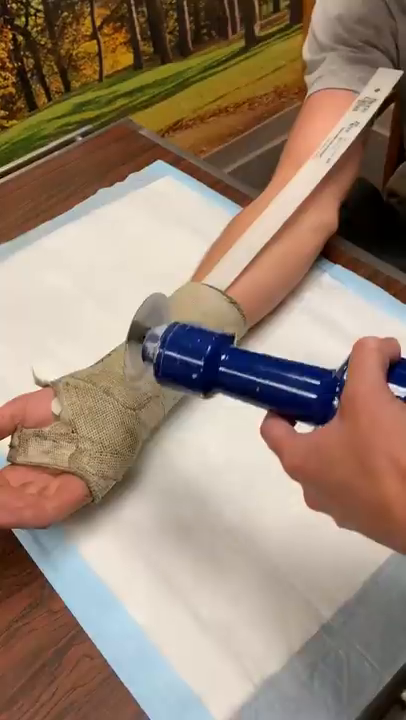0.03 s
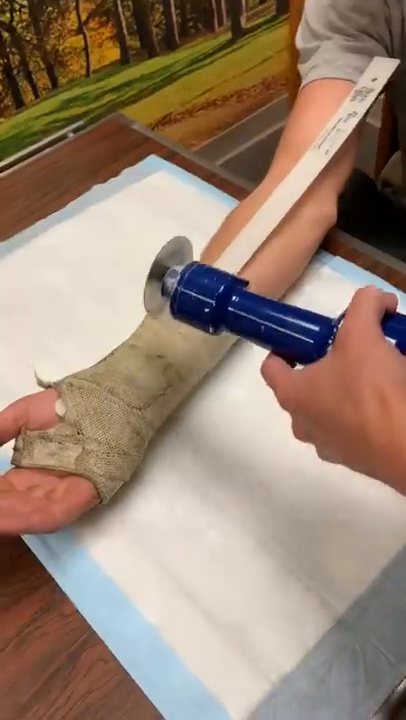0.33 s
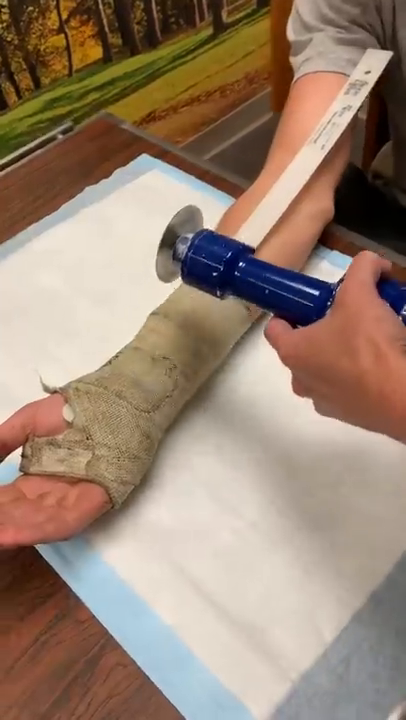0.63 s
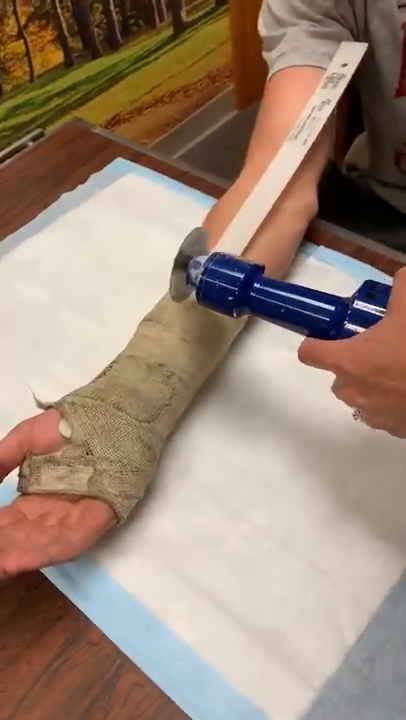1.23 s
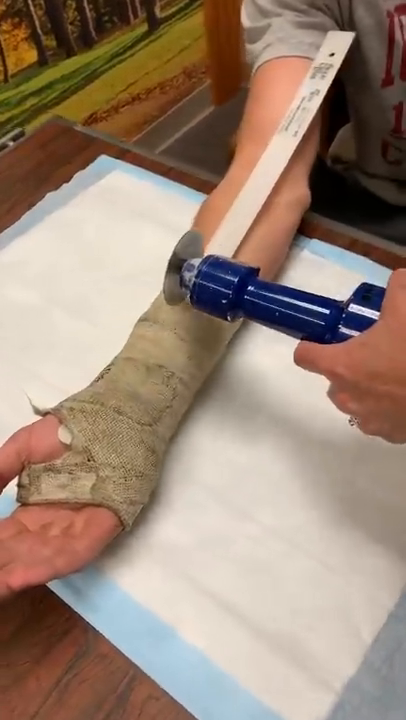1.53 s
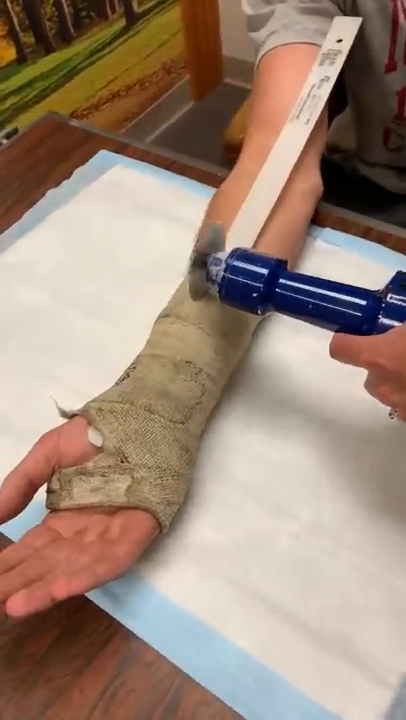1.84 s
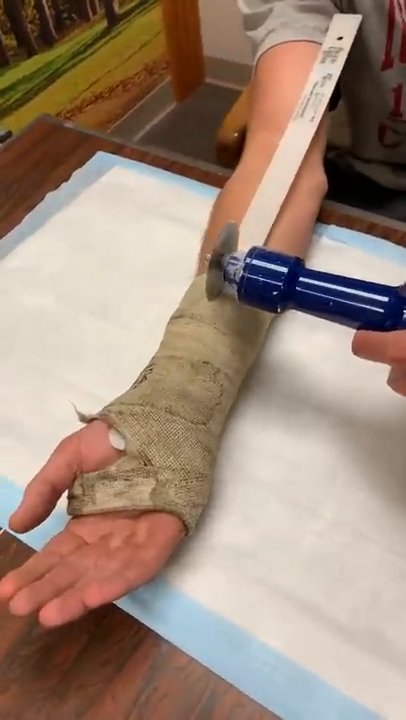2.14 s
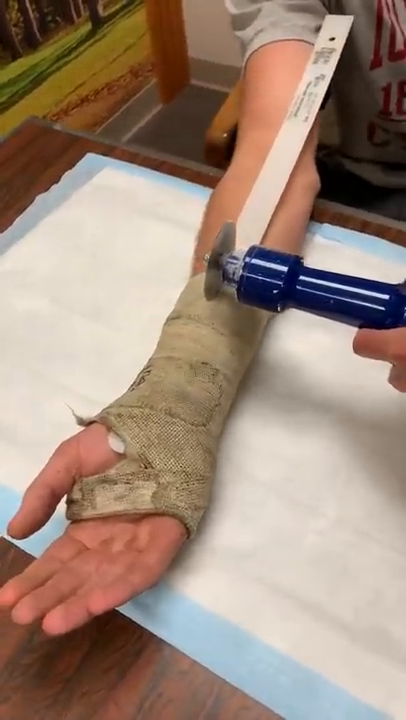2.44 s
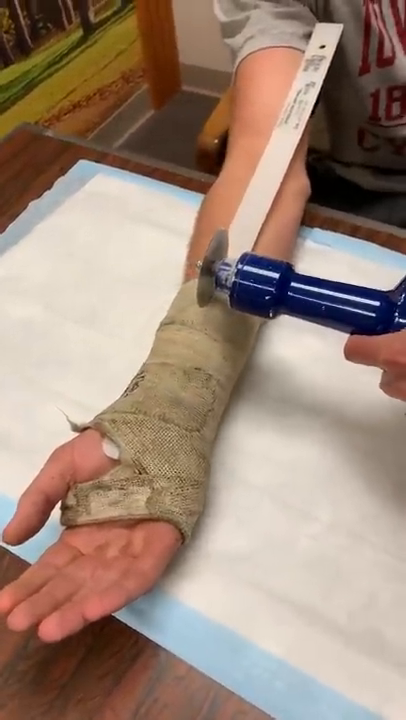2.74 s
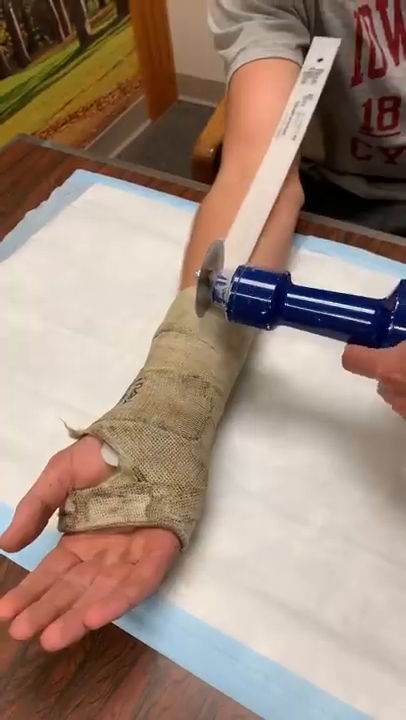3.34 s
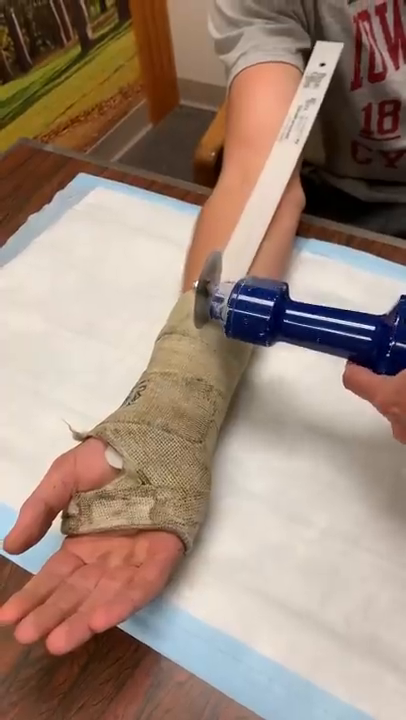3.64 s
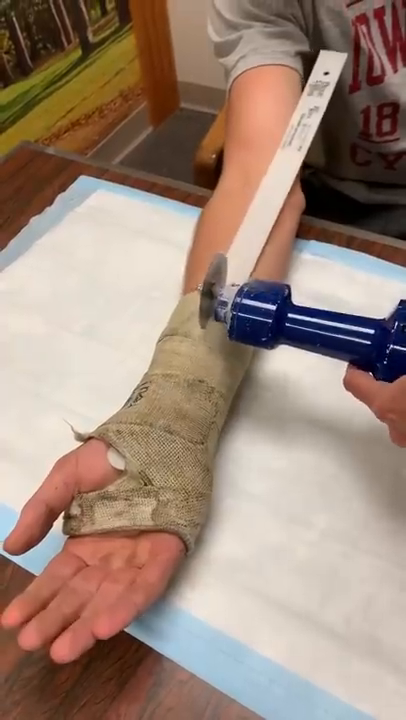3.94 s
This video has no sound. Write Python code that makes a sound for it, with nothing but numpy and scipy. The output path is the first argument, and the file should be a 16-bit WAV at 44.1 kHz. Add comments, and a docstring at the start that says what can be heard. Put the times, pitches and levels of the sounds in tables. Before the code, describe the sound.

Harsh, rasping whine of an electric saw cutting through a hard arm cast, close by.

```python
"""A harsh buzz cuts in abruptly and drops out for an instant: an oscillating cast saw, close by in a
small room, runs up to speed, bites into a hard cast and sags under load. Each stroke of the blade is a
knock and a burst of friction. The periodic knocks form a harmonic series; the friction makes a pulsing
rasp and excites the steel blade, which rings near 5.5 kHz. The gearbox growls at first, and faint mains
hum and room rumble lie underneath."""
import sys
import numpy as np
from scipy import signal
from scipy.fft import rfft, irfft, next_fast_len
from scipy.io import wavfile
from scipy.ndimage import map_coordinates

SR = 44100
rng = np.random.default_rng(int(sys.argv[2]) if len(sys.argv) > 2 else 0)


def dump(signal):
    """Clip the signal to [-1, 1] and save it as 16-bit WAV at the path in sys.argv[1]."""
    limited = np.clip(np.atleast_2d(signal).T, -1, 1)
    pcm = np.round(limited * 32767).astype(np.int16)
    wavfile.write(sys.argv[1], SR, pcm)


N = 176400

# Levels in the tables are relative; each source adds its own gain.
# motor running up, then sagging under load (time [s], stroke rate [Hz])
STROKE_RATE = [(0.08, 206), (0.15, 221), (0.25, 245), (0.35, 249), (0.45, 261), (0.55, 266.9),
               (0.75, 274.3), (0.95, 278.6), (1.2, 281.8), (1.7, 283), (1.97, 279), (2.25, 273.5),
               (2.35, 272), (2.45, 267.5), (2.92, 262), (3.13, 251), (3.25, 254), (3.5, 258), (3.68, 254),
               (4.0, 249)]
# drone at the stroke rate (time [s], level [dB])
FUNDAMENTAL = [(0.08, -61), (0.38, -47.5), (0.69, -58.5), (0.84, -51), (1.89, -52.5), (1.96, -66),
               (2.08, -49), (2.27, -41), (3.01, -51), (3.11, -42.5), (3.58, -48.5), (4.0, -39)]
# two whining harmonics (time [s], 6th harmonic [dB], 7th harmonic [dB])
WHINE_LEVELS = [(0.11, -55, -42), (0.25, -45, -37), (0.35, -54, -52), (0.44, -33.5, -63),
                (0.801, -42.5, -71), (0.95, -36, -42), (1.25, -39, -49), (1.6, -36.5, -51),
                (1.95, -39, -43), (2.06, -47, -33), (2.17, -37, -33), (2.25, -42, -37.5), (2.34, -42, -29),
                (2.45, -53, -43), (2.55, -42, -34.5), (2.65, -57, -38), (2.75, -40.5, -36.5),
                (2.95, -42.5, -37), (3.05, -53, -38), (3.25, -50, -40.5), (3.35, -48, -36),
                (3.47, -36.5, -46.5), (3.75, -43.5, -39.5), (3.97, -50, -43.5)]
# body of the buzz (harmonic number, level in a light cut [dB], level in a deep cut [dB])
LOW_HARMONICS = [(2, -51.5, -52), (3, -48.5, -52), (4, -50, -57.5), (5, -45, -47), (8, -44.5, -50.5),
                 (9, -49.5, -56), (10, -52, -47), (11, -50.5, -47), (12, -45.5, -46), (13, -56.5, -44),
                 (14, -46, -43), (15, -37, -46), (16, -38, -55), (17, -43, -64), (18, -49, -64)]
# spectral envelope of the buzz's treble harmonics (frequency [Hz], level [dB])
TREBLE_SPECTRUM = [(4700, -44), (5600, -44), (6200, -52), (6900, -55.5), (7700, -44.5), (8400, -54.5),
                   (9500, -58), (11000, -57), (12300, -52), (14000, -51), (16000, -48)]
# treble edge, strongest with the blade pressed in (time [s], gain [dB])
TREBLE_EDGE = [(0.1, 1), (1.0, -0.5), (1.95, 0), (2.05, -3.5), (2.55, 3), (3.0, -2), (4.0, -2)]
# brief swells of single harmonics (time [s], width [s], level [dB], harmonic number)
SQUEALS = [(0.22, 0.067, -39.5, 3), (0.66, 0.14, -40, 3), (0.6, 0.2, -49, 17), (0.6, 0.33, -40, 12),
           (1.07, 0.36, -43.5, 10), (1.65, 0.33, -38, 29), (1.8, 0.1, -42, 43), (2.03, 0.087, -34, 44),
           (2.09, 0.06, -37, 24), (2.22, 0.13, -31.5, 18), (2.26, 0.086, -38, 45), (2.3, 0.21, -43, 17),
           (2.329, 0.017, -28, 25), (2.46, 0.045, -35, 25), (2.48, 0.13, -36, 12), (2.49, 0.06, -40, 46),
           (2.5, 0.07, -35, 34), (2.53, 0.1, -32, 10), (2.96, 0.03, -35, 13), (2.98, 0.14, -42.5, 8),
           (3.6, 0.09, -39, 13)]
# the steel blade's two main modes (frequency [Hz], bandwidth [Hz], gain [dB])
BLADE_MODES = [(5341, 65, 6), (5736, 310, 0)]
# the blade's upper modes (frequency [Hz], bandwidth [Hz], gain [dB])
UPPER_MODES = [(8300, 240, -2), (14300, 60, -5.5)]
# the shaft's mode (frequency [Hz], bandwidth [Hz], gain [dB])
SHAFT_MODE = [(4106, 250, 0)]
# clean singing of the main blade modes (time [s], first mode [dB], second mode [dB])
BLADE_SINGING = [(0.11, -27, -41), (0.26, -20.5, -36), (0.36, -27.5, -32), (0.43, -17, -39),
                 (0.53, -37, -28), (0.731, -24, -26), (0.84, -28, -40), (0.95, -17.5, -43),
                 (1.07, -19.5, -26), (1.17, -25, -36), (1.4, -35, -31), (1.61, -26.5, -41.5),
                 (1.83, -29, -28), (1.96, -21.5, -25), (2.1, -40, -26), (2.27, -28, -27.5),
                 (2.4, -48, -30.5), (2.66, -28, -35), (2.84, -39, -26.5), (3.1, -33, -38),
                 (3.33, -31.5, -27), (3.97, -35, -32)]
# clean singing of the shaft (time [s], level [dB])
SHAFT_SINGING = [(0.11, -29), (0.6, -27.5), (0.9, -35), (1.25, -30.5), (1.7, -40.5), (2.1, -54)]
# rough ring of the main blade modes (time [s], first mode [dB], second mode [dB])
BLADE_RING = [(0.11, -21.5, -39), (0.37, -23, -35), (0.41, -28, -39), (0.56, -18, -32), (0.751, -29, -42),
              (0.86, -25.5, -29.5), (1.1, -36, -28.5), (1.18, -30.5, -31.5), (1.8, -28, -45),
              (1.84, -35, -27.5), (1.93, -25, -37), (2.07, -26.5, -30.5), (2.72, -44, -29.5),
              (3.18, -47, -27.5), (3.83, -26, -26.5), (3.97, -29, -30)]
# rough ring of the upper blade modes (time [s], level [dB])
UPPER_RING = [(0.11, -19.5), (0.31, -31), (0.5, -23), (0.83, -27.5), (1.01, -24), (1.1, -34), (1.39, -28.5),
              (2.15, -29.5), (2.6, -36), (2.98, -30), (3.29, -48), (3.97, -27)]
# friction of the teeth in the cast (time [s], scrape level [dB], hiss level [dB])
RASP_LEVELS = [(0.11, -28, -21), (0.28, -30, -24.5), (0.69, -30.5, -26), (0.82, -33, -27.5),
               (0.87, -30.5, -28.5), (1.04, -35, -34.5), (1.25, -33, -33.5), (1.39, -33.5, -33),
               (1.95, -33.5, -32), (2.08, -33.5, -30.5), (2.32, -34.5, -31), (2.62, -34, -34.5),
               (2.87, -34.5, -32), (3.07, -33.5, -32), (3.11, -31, -32.5), (3.43, -36.5, -33),
               (3.92, -31, -30), (3.97, -33.5, -34.5)]
# the lower scrape of the teeth (frequency [Hz], level [dB])
SCRAPE_SPECTRUM = [(30, -58), (170, -21), (250, -23), (400, -5.5), (550, -8), (750, -9.5), (1000, -6),
                   (1300, -6), (1700, -3.5), (2000, -1), (2400, -11.5), (3000, -1), (3500, 1), (4100, 12),
                   (4700, -29), (5500, 6), (6500, 3), (9000, -35)]
# the higher hiss of the teeth (frequency [Hz], level [dB])
HISS_SPECTRUM = [(1000, -28.5), (4000, -8), (5500, -24), (6400, -14), (6800, 6.5), (7700, 1), (8400, -20),
                 (9100, -5), (9600, 2), (10500, -2), (12000, -6.5), (13300, -7), (14700, -2.5),
                 (15100, 0.5), (16000, -9.5)]
# teeth catching in the cast (release time [s], build-up [s], level [dB])
CATCHES = [(0.98, 0.11, -41.5), (2.34, 0.038, -34), (3.077, 0.056, -34.5)]
# crunch of a catch (frequency [Hz], level [dB])
CRUNCH_SPECTRUM = [(100, -21), (600, -20), (1400, 0), (2000, 2.5), (3200, 1.5), (4500, -28), (8000, -30)]
# the gearbox housing's mode (frequency [Hz], bandwidth [Hz], gain [dB])
HOUSING_MODE = [(816, 620, 0)]
# dull bump as the blade catches (time [s], frequency [Hz], level [dB], width [s])
BUMP = [(3.12, 87, -51, 0.036)]
# mains harmonics (frequency [Hz], level [dB])
MAINS_HUM = [(120, -70.5), (180, -84.5)]
# course of the room rumble (time [s], level [dB])
RUMBLE_LEVEL = [(.1, -57), (.5, -78), (1, -78), (3.5, -80), (4, -64)]
# colour of the room rumble (frequency [Hz], level [dB])
RUMBLE_SPECTRUM = [(20, -32), (45, -22), (80, 12), (150, -5), (400, -22), (4000, -50)]
# colour of the wall reflections (frequency [Hz], gain [dB])
ROOM_COLOUR = [(250, 2.5), (500, 7), (2200, 5.5), (4500, -6.5), (9000, -19), (16000, -5)]
# phase between the two microphone ports (frequency [Hz], lead of the left [rad])
PORT_PHASE = [(0, 0), (1400, -.2), (2200, 1.9), (3200, 1.4), (4570, 3.14), (6700, 6.28), (9050, 9.42),
              (11200, 12.57), (13100, 15.7), (16000, 19.6)]
# balance of the two ports (frequency [Hz], left minus right [dB])
PORT_BALANCE = [(60, -1), (150, -0.5), (700, -5), (1600, -2), (3000, 0), (16000, 0)]
# abrupt onset and one dropout (time [s], gain [0-1])
GATE = [(.0595, 0), (.0615, 1), (.069, 1), (.074, 0), (.083, 0), (.0855, 1)]

TIME = np.arange(N) / SR
BITE_SHARPNESS = 0.79  # how closely the friction clings to one moment of the stroke


def drive_buzz(stroke_hz, strokes, pressed_in_s=1.874):
    """Periodic excitation: a knock at every stroke gives harmonics of the stroke rate."""
    drone = amp(curves(FUNDAMENTAL)[0] - 1) * harmonic(strokes, 1, waver_db=1)
    whine = sum(amp(db - 0.93) * harmonic(strokes, order, waver_db=0.5)
                for order, db in zip((6, 7), curves(WHINE_LEVELS)))
    edge_db, = curves(TREBLE_EDGE)
    gains = {order: amp(edge_db + along(TREBLE_SPECTRUM, order * stroke_hz)) for order in range(19, 56)}
    for order, light_db, deep_db in LOW_HARMONICS:
        gains[round(order)] = amp(np.where(TIME > pressed_in_s, deep_db, light_db) - 0.5)
    for peak_s, width_s, db, order in SQUEALS:
        swell = amp(db) * np.exp(-1.4 * ((TIME - peak_s) / width_s) ** 2)
        gains[round(order)] = np.hypot(gains[round(order)], swell)  # powers add
    buzz = sum(gain * harmonic(strokes, order, waver_db=2.4 if order < 5 else 1.8)
               for order, gain in gains.items())
    return drone + whine + buzz


def harmonic(strokes, order, waver_db):
    """Amplitude modulation: one multiple of the stroke rate wavers and flutters in level."""
    level_db = waver_db * (wobble(7.97) + 1.5 * wobble(45))
    return np.sqrt(2) * amp(level_db) * np.sin(2 * np.pi * (order * strokes + rng.random()))


def steel_singing(stroke_hz, strokes):
    """Forced resonance: the harmonic nearest each mode of blade and shaft makes it sing."""
    orders = np.arange(14, 27)[:, None]
    out = np.zeros(N)
    for mode, db in zip(BLADE_MODES + SHAFT_MODE, curves(BLADE_SINGING) + curves(SHAFT_SINGING)):
        gains = abs(resonance([mode], orders * stroke_hz)) ** 2
        tones = np.sin(2 * np.pi * (orders * strokes + rng.random(orders.shape)))
        rms = np.sqrt((gains ** 2).sum(0) / 2)
        out += amp(db - 1 + wobble(9.7)) * (gains * tones).sum(0) / rms
    return out


def teeth_rasp(strokes, scatter_db=1.2):
    """Frictional excitation: each stroke scrapes and hisses in the cast and rings the blade's modes."""
    stroke_index = strokes.astype(int)
    force = amp(scatter_db * rng.standard_normal(4096)[stroke_index])
    scrape_db, hiss_db = curves(RASP_LEVELS)
    scrape = amp(scrape_db + 0.5) * coloured(force * stroke_noise(strokes, 0.33), SCRAPE_SPECTRUM)
    hiss = amp(hiss_db - 0.5) * coloured(force * stroke_noise(strokes, 0.077), HISS_SPECTRUM)
    ring = amp(curves(UPPER_RING)[0] - 6) * ringing(force * stroke_noise(strokes), UPPER_MODES)
    ping_envelope = force * abs(np.sin(np.pi * strokes)) ** 1.9  # one short ping per stroke
    for mode, db in zip(BLADE_MODES, curves(BLADE_RING)):
        ping_phase = rng.random(4096)[stroke_index]
        pings = unit(ping_envelope * np.sin(2 * np.pi * (mode[0] * TIME + ping_phase)))
        rough = ringing(force * stroke_noise(strokes), [mode])
        ring += amp(db - 2) * unit(rough + pings)
    return scrape + hiss + ring


def stroke_noise(strokes, sharpness=BITE_SHARPNESS):
    """Modulated noise: one burst per stroke, narrower as the sharpness rises."""
    return np.exp(-sharpness * np.cos(2 * np.pi * strokes)) * rng.standard_normal(N)


def blade_grip(slip_s=3.08, dip_db=-6.5, recovery_s=0.047):
    """Exponential recovery: the friction's gain falls as the blade breaks through, then returns."""
    since = TIME - slip_s
    return amp(dip_db * (since > 0) * np.exp(-abs(since) / recovery_s))


def crunches(strokes, release_s=0.0024):
    """Stick and slip: a coarse rasp builds while the teeth catch and stops as they let go."""
    envelope = np.zeros(N)
    for let_go_s, build_s, db in CATCHES:
        width_s = np.where(TIME < let_go_s, build_s, release_s)
        envelope += amp(db) * np.exp(-((TIME - let_go_s) / width_s) ** 2)
    return envelope * coloured(stroke_noise(strokes), CRUNCH_SPECTRUM)


def gearbox_growl(strokes, fade_db_per_s=9):
    """Broad resonance: the gearbox rattles in its housing at spin-up, then fades."""
    knocks = stroke_noise(strokes, sharpness=1)
    rattle = unit(filtered(knocks, lambda hz: resonance(HOUSING_MODE, hz) ** 2))
    return amp(-40.5 - fade_db_per_s * TIME) * rattle


def blade_bump():
    """A wave packet: a few low cycles under a Gaussian envelope thud as the blade catches."""
    return sum(amp(db) * np.exp(-((TIME - at_s) / width_s) ** 2) * np.sin(2 * np.pi * hz * (TIME - at_s))
               for at_s, hz, db, width_s in BUMP)


def mains_hum():
    """Harmonics of the mains frequency sound as steady low tones."""
    return sum(np.sqrt(2) * amp(db) * np.sin(2 * np.pi * hz * TIME) for hz, db in MAINS_HUM)


def room_rumble():
    """Filtered noise: the room's faint background has its energy in the bass."""
    return amp(curves(RUMBLE_LEVEL)[0]) * coloured(rng.standard_normal(N), RUMBLE_SPECTRUM)


def reverberation(x, t60_s=0.3):
    """A diffuse field: wall reflections decay exponentially, with a separate tail at each port."""
    reflected = filtered(x, lambda hz: amp(along(ROOM_COLOUR, hz)))
    t = TIME[:SR // 3]
    tails = rng.standard_normal((2, len(t))) * amp(-60 * t / t60_s)
    return signal.fftconvolve(reflected[None], tails / np.linalg.norm(tails[0]), axes=1)[:, :N]


def port_delay(x):
    """Path difference: the direct sound's treble reaches the left port first."""
    half_turn = np.array([[0.5j], [-0.5j]])  # each port takes half of the phase angle
    return filtered(x, lambda hz: np.exp(half_turn * np.interp(hz, *np.transpose(PORT_PHASE))))


def amp(db):
    """Decibels to amplitude ratio."""
    return 10 ** (np.asarray(db) / 20)


def unit(x):
    """Normalisation to rms 1."""
    return x / np.sqrt(np.mean(x ** 2) + 1e-20)


def along(points, hz):
    """Interpolation of (frequency, value) points on a logarithmic axis."""
    frequencies, values = np.transpose(points)
    return np.interp(np.log(hz + 1), np.log(frequencies + 1), values)


def curves(rows):
    """Linear interpolation in time: one value per sample for each column after the first."""
    times, *columns = np.transpose(rows)
    return [np.interp(TIME, times, column) for column in columns]


def wobble(knots_per_s):
    """Spline interpolation of random knots gives a smooth fluctuation."""
    knots = rng.standard_normal(4096)
    coarse = np.arange(0, N + 32, 32)
    return np.interp(np.arange(N), coarse, map_coordinates(knots, [coarse * knots_per_s / SR], mode="wrap"))


def filtered(x, response):
    """Linear filtering: the spectrum of x times a complex frequency response."""
    size = next_fast_len(N + SR // 2)
    return irfft(rfft(x, size) * response(np.fft.rfftfreq(size, 1 / SR)), size)[..., :N]


def coloured(x, spectrum):
    """Spectral shaping by (frequency, level) points, at rms 1."""
    return unit(filtered(x, lambda hz: amp(along(spectrum, hz))))


def resonance(modes, hz):
    """Modal superposition: the summed complex response of damped oscillators."""
    return sum(amp(db) * 1j * hz * width / (centre ** 2 - hz ** 2 + 1j * hz * width)
               for centre, width, db in modes)


def ringing(force, modes):
    """Forced response of the modes, at rms 1."""
    return unit(filtered(force, lambda hz: resonance(modes, hz)))


def scene():
    """Superposition: one slightly unsteady speed drives the saw, heard directly and off the walls."""
    stroke_hz = curves(STROKE_RATE)[0] * (1 + 0.00084 * wobble(80))
    strokes = np.cumsum(stroke_hz) / SR  # phase in cycles
    tones = drive_buzz(stroke_hz, strokes) + steel_singing(stroke_hz, strokes)
    rasp = blade_grip() * teeth_rasp(strokes) + crunches(strokes) + gearbox_growl(strokes)
    walls = reverberation(rasp + amp(-6) * tones)  # the tones are sent to the walls 6 dB below the rasp
    direct = port_delay(tones + rasp + blade_bump() + mains_hum() + room_rumble())
    pair = direct + amp(-6) * walls
    return filtered(pair, lambda hz: amp(np.array([[0.5], [-0.5]]) * along(PORT_BALANCE, hz)))


def record(dry):
    """Gating and band limiting: the sound cuts in, drops out once and has nothing above 15.9 kHz."""
    return filtered(dry * curves(GATE)[0], lambda hz: hz < 15900)


dry = scene()
out = record(dry)
dump(out)
```